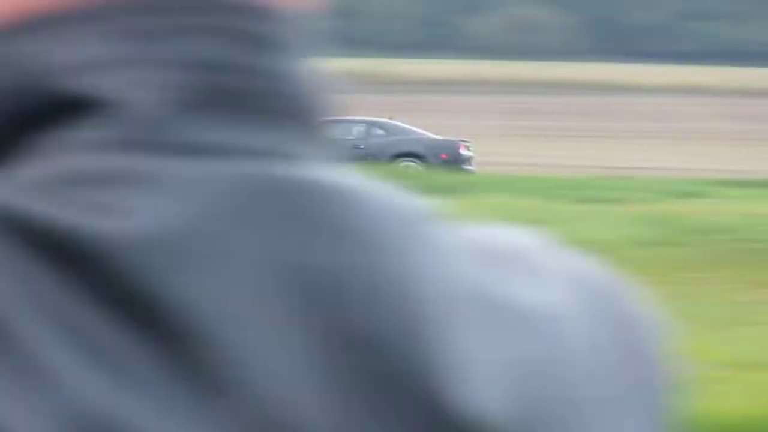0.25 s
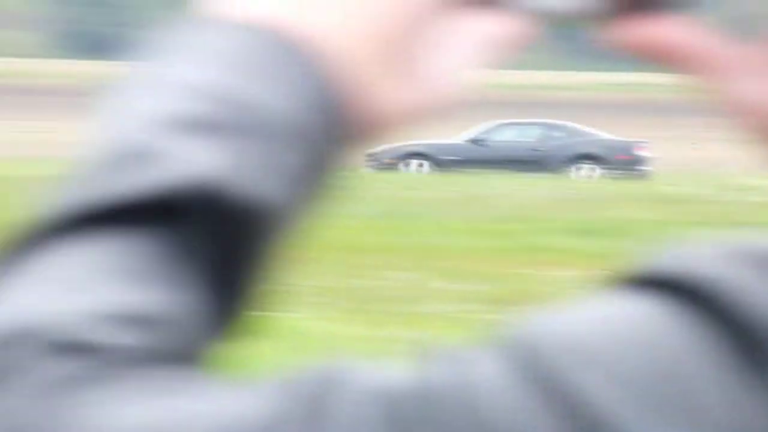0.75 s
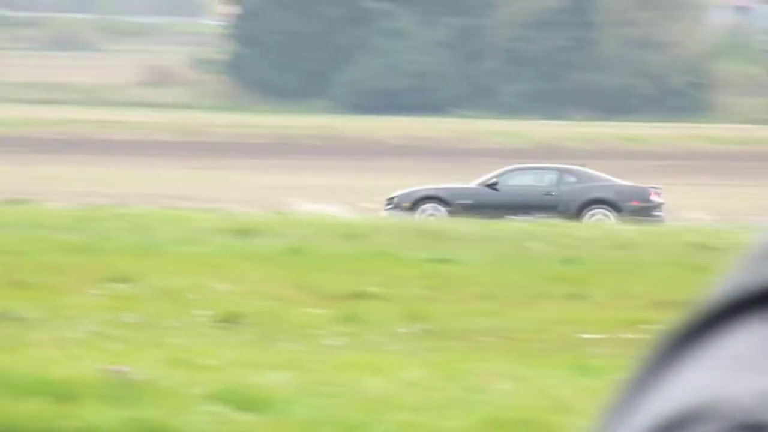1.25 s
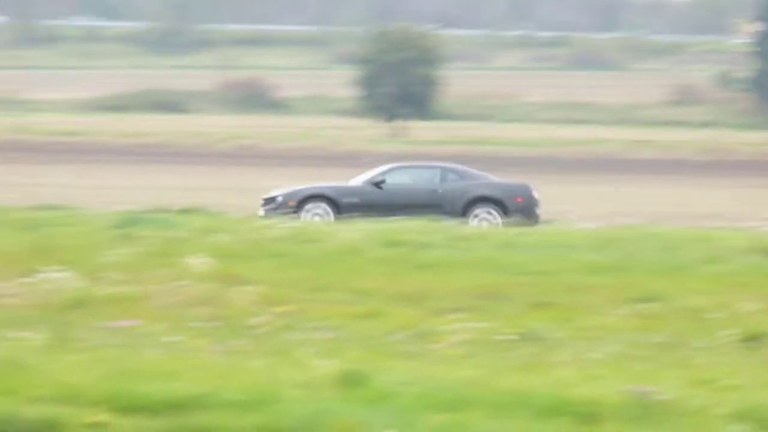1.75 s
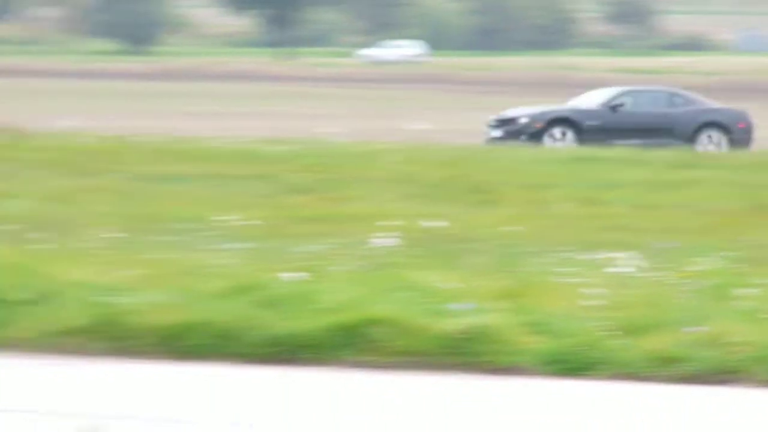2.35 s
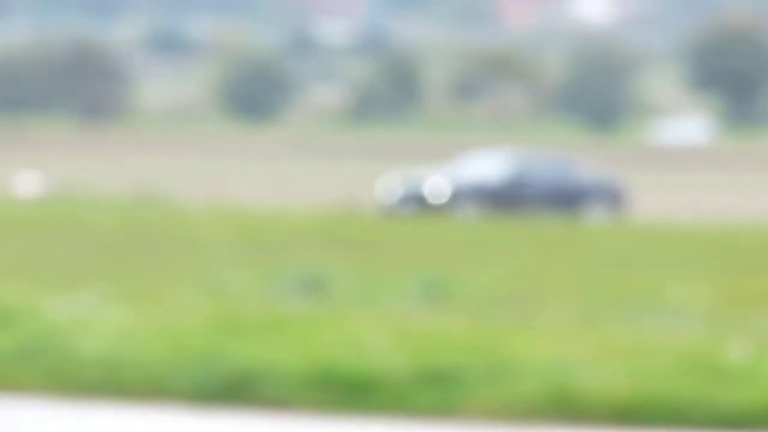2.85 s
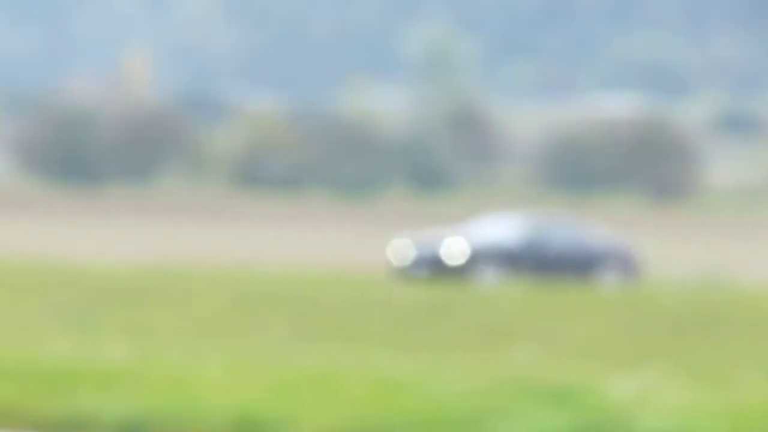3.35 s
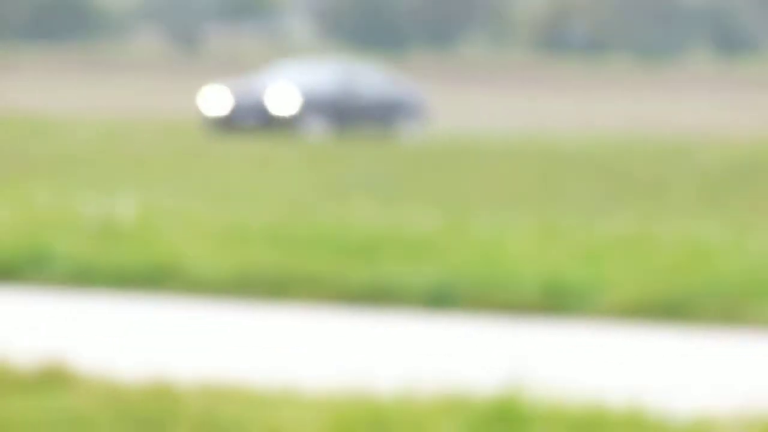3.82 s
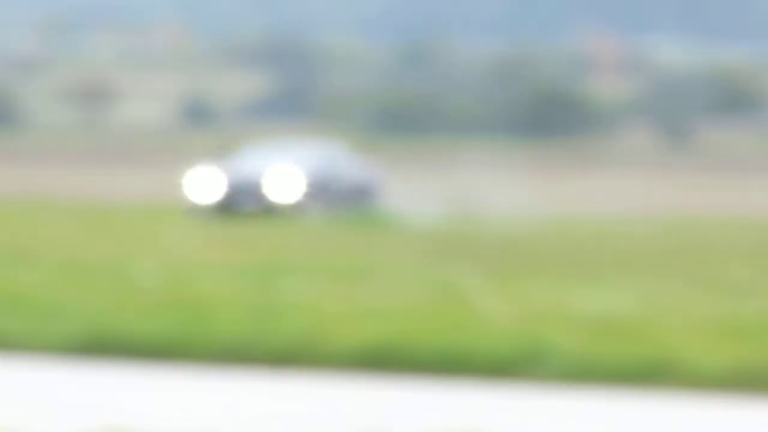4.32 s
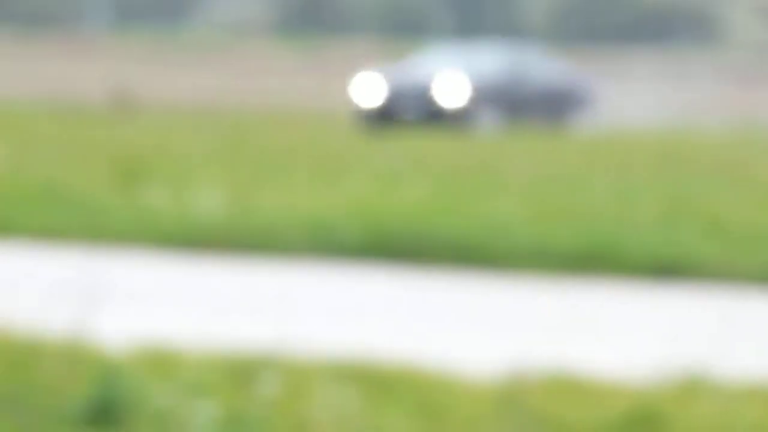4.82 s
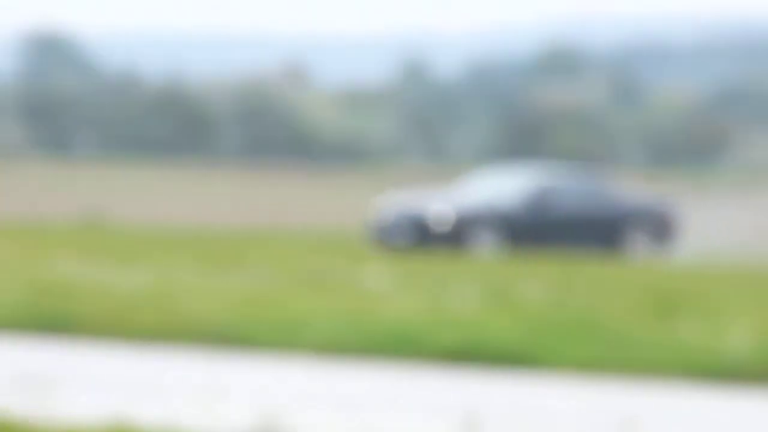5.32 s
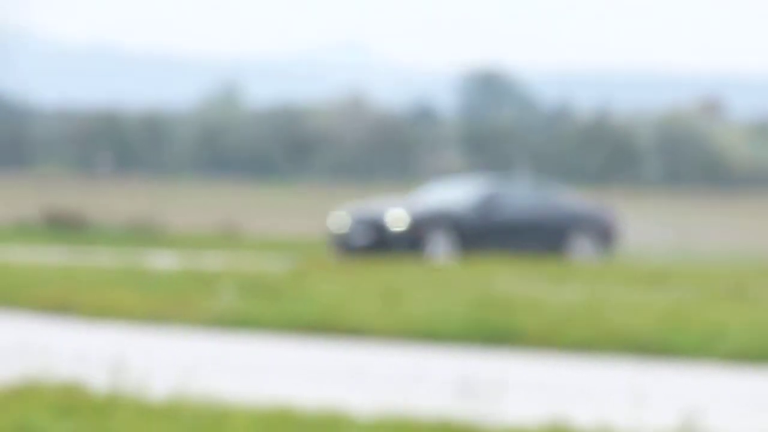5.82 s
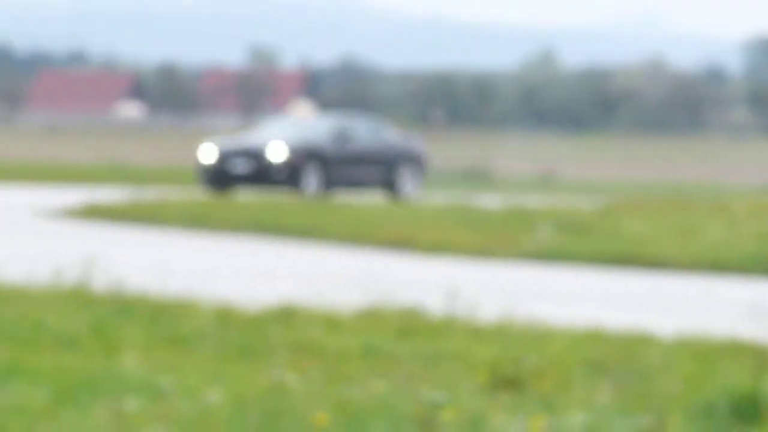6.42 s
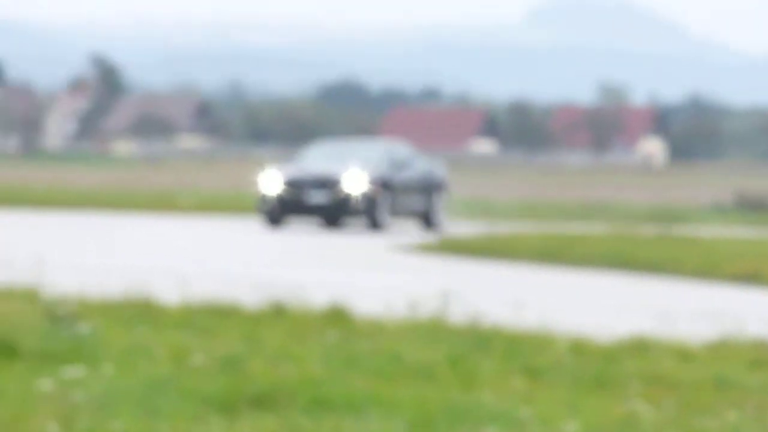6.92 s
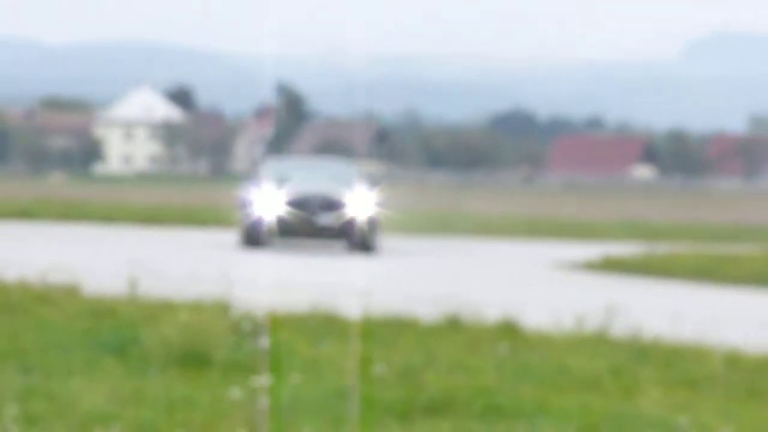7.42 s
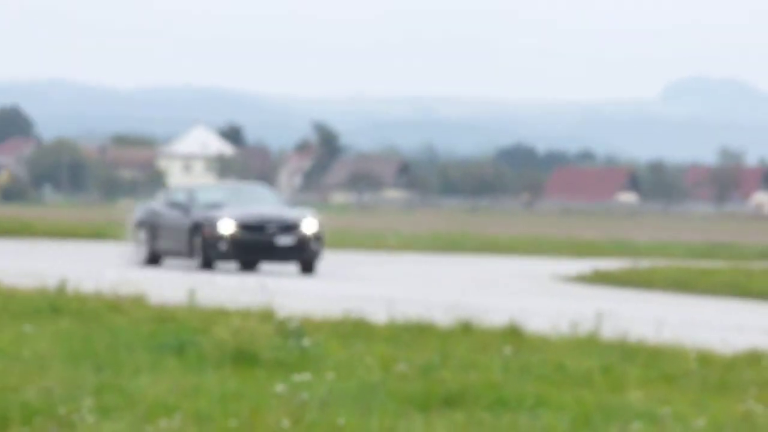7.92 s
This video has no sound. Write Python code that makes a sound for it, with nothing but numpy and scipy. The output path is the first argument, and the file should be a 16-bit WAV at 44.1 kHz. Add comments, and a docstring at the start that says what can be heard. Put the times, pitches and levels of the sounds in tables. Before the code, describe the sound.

Wind rumbles on an outdoor microphone over the soft rush of distant tyres, and a jacket rustles faintly close by. A car then slides into a long, rough, wavering tyre squeal with its exhaust droning low underneath. The squeal dies away and strong gusts thump the microphone. A second, slightly higher and rougher squeal follows, continuing to the end under heavy wind.

```python
"""Wind on the microphone comes first, over tyres rolling far off across grass; a jacket rustles close by.
Out on the open track a tyre moans, then a V8 coupe drifts through two bends, side on and then nose on.
Its tyres stick and slip in wavering, rough squeals, with the exhaust droning under the first slide.
Gusts buffet the camera microphone throughout, hardest between the two slides."""
import sys
import numpy as np
from scipy import signal
from scipy.fft import rfft, irfft
from scipy.io import wavfile

SR = 44100
rng = np.random.default_rng(int(sys.argv[2]) if len(sys.argv) > 2 else 0)


def bounce(signal):
    """Save signal as a 16-bit WAV file at the path given by the first command-line argument."""
    frames = np.transpose(np.atleast_2d(signal))
    limited = np.clip(frames, -1, 1)
    pcm = np.round(limited * 32767).astype(np.int16)
    wavfile.write(sys.argv[1], SR, pcm)


N = 360297

# The breeze at the microphone. Each row: time in seconds, strength in dB.
BREEZE = [(0.0, -41), (0.45, -41.5), (1.2, -32), (1.95, -37.5), (3.1, -40.5), (3.25, -34), (3.95, -34),
          (4.2, -43.5), (4.82, -52), (4.92, -26.5), (5.46, -31.5), (5.52, -42.5), (5.58, -24),
          (6.15, -19.5), (6.6, -17), (6.95, -22), (7.5, -24), (7.62, -23), (8.17, -18.5)]
# Gusts on top of it. Each row: peak time in seconds, half length in seconds, strength in dB.
GUSTS = [(0.118, 0.037, -35), (0.291, 0.024, -33.5), (0.75, 0.011, -28.5), (0.871, 0.028, -27),
         (1.07, 0.025, -30), (1.114, 0.018, -31), (1.355, 0.024, -34), (2.869, 0.024, -32.5),
         (3.233, 0.03, -29.5), (3.361, 0.031, -29.5), (3.866, 0.05, -29.5), (4.332, 0.028, -33),
         (4.984, 0.033, -23.5), (5.147, 0.028, -22), (5.22, 0.025, -23), (5.354, 0.015, -24),
         (5.431, 0.038, -24), (5.574, 0.062, -18.5), (5.654, 0.014, -16), (5.689, 0.0091, -20),
         (5.83, 0.029, -14.5), (6.05, 0.015, -19.5), (6.076, 0.01, -19.5), (6.215, 0.022, -19),
         (6.288, 0.01, -18), (7.038, 0.02, -21), (7.57, 0.04, -22), (7.758, 0.041, -21)]
# Eddies on the microphone, largest to smallest. Each row: frequency in Hz, relative density in dB.
HEAVE_SPECTRUM = [(15, -8), (35, -1), (70, 1.5), (110, -6)]
RUMBLE_SPECTRUM = [(45, -8), (75, 1), (120, 2), (200, 0), (260, -8.5), (340, -31)]
FLUTTER_SPECTRUM = [(70, -22.5), (140, 1), (220, 0.5), (320, -3), (450, -11), (700, -24.5), (1200, -54)]
SPLUTTER_SPECTRUM = [(200, -5), (400, 5.5), (600, -3), (1000, -11.5), (2000, -26), (3500, -68)]
# Rolling tyres from across the grass. Each row: frequency in Hz, relative density in dB.
ROLLING_SPECTRUM = [(420, -15.5), (530, -5), (700, -7.5), (960, -3.5), (1200, -9.5), (1650, -17),
                    (2400, -30), (3100, -33.5), (4200, -52)]
# Their rise as the scene opens. Each row: time in seconds, level in dB.
ROLLING_LEVEL = [(0.0, -54.5), (0.906, -49.5), (1.8, -49.5)]
# A jacket near the microphone. Each row: peak time in seconds, half length in seconds, level in dB.
RUSTLES = [(0.38, 0.062, -67.5), (0.83, 0.091, -69)]
# Its brushing cloth. Each row: frequency in Hz, relative density in dB.
CLOTH_SPECTRUM = [(1800, 2), (2700, 2), (3400, -9), (4200, -16)]
# Moans ahead of the first bend. Each row: peak time in seconds, half length in seconds, level in dB.
MOANS = [(0.85, 0.17, -51.5), (1.78, 0.18, -51.5)]
# The leading tyre, one curve a bend. Each row: time in seconds, slip pitch in Hz, load in dB.
FIRST_LEAD_TYRE = [(1.92, 927, -19.5), (2.07, 909, -8.5), (2.18, 869, -2.5), (2.26, 744, -4),
                   (2.44, 736, 0.5), (2.55, 821.6, -1), (2.68, 819.6, -1.5), (2.81, 838.1, 2),
                   (2.95, 752, 3), (3.13, 759.6, 1), (3.36, 812.6, -1), (3.74, 893, 0.5), (3.85, 839.3, -2),
                   (4.08, 869.7, 3), (4.3, 848.5, -3), (4.47, 820.5, -1), (4.6, 874.4, -1), (4.88, 838, -1),
                   (4.99, 842, -4), (5.1, 815.3, 2), (5.24, 778.5, -4), (5.42, 828, -8), (5.54, 892, -35)]
SECOND_LEAD_TYRE = [(6.14, 895, -16), (6.2, 878, -9), (6.48, 897, -6), (6.68, 907.5, -1), (6.84, 900, -4),
                    (7.16, 931.6, -3.5), (7.39, 954, 0), (7.48, 894, -1), (7.77, 916.6, -0.5),
                    (7.9, 911, 0.5), (8.17, 899, 0)]
# The other driven tyre. Each row: time in seconds, slip pitch in Hz, load in dB against the leading one.
FIRST_LOW_TYRE = [(1.98, 712, 2), (2.1, 652, 3), (2.3, 626.3, 2.5), (2.65, 695.6, -5), (3.03, 636, -3),
                  (3.6, 728.7, -2), (4.42, 703.5, 0.5), (4.75, 760.5, -0.5), (5.3, 702.5, -2.5)]
SECOND_LOW_TYRE = [(6.2, 827, 3.5), (6.7, 802, -1.5), (7.1, 815, -4), (7.7, 771, -6), (8.17, 754, 2)]
# Wheelspin in each bend. Each row: time in seconds, amount in dB against a steady drift.
FIRST_SPIN = [(1.9, -7), (2.07, -1), (2.5, -8), (2.76, -3.5), (3.0, -9), (3.6, -2), (3.95, 4.5),
              (4.12, 8.5), (4.3, 3), (4.44, 3), (4.56, 9.5), (4.98, 2), (5.5, -40)]
SECOND_SPIN = [(6.2, -27.5), (6.9, -11.5), (7.16, 0.5), (7.39, 3.5), (7.47, -7.5), (7.65, -7.5),
               (8.17, 2.5)]
# Tyre resonances lift any overtone passing through. Each row: frequency in Hz, level in dB at full load.
CARCASS_RESONANCES = [(630, -40.5), (770, -38.5), (845, -28.5), (900, -35), (960, -28.5), (1270, -43),
                      (1400, -38), (1510, -36), (1600, -36.5), (1700, -43.5), (1850, -55.5), (2250, -64.5),
                      (2700, -58.5), (3500, -78.5)]
# Tearing rubber, heard from two angles. Each row: frequency in Hz, relative density in dB.
RASP_SIDE_ON = [(1150, -11), (1420, 3.5), (1660, 0), (1780, -10.5), (2000, -18.5), (2250, -9.5),
                (2650, -13), (3400, -22.5), (3800, -35.5), (5500, -47)]
RASP_NOSE_ON = [(1150, -4.5), (1420, 2), (1660, 2), (1800, -7.5), (2050, -14.5), (2300, -6), (2500, -11),
                (2800, -13), (3500, -20.5), (3950, -34), (5500, -44)]
# The leading tyre bites. Each row: peak time in seconds, half length in seconds, relative level in dB.
BITES = [(2.358, 0.029, -42), (2.89, 0.049, -49.5), (3.09, 0.063, -47.5), (3.33, 0.024, -57),
         (4.418, 0.04, -51.5), (5.12, 0.043, -49.5), (5.24, 0.052, -54)]
# The distant exhaust. Each row: time in seconds, pitch of the fifth order in Hz, relative level in dB.
EXHAUST_CURVE = [(2.35, 117, -65), (2.5, 124, -24), (2.76, 135, -29.5), (3.0, 119, -59), (3.15, 123, -36.5),
                 (3.35, 135, -34.5), (4.05, 148, -42.5), (4.6, 154, -41), (4.9, 150, -43)]
# Its orders. Each row: multiple of the four-stroke cycle, relative level in dB side on, then nose on.
EXHAUST_ORDERS = [(3, -13, -7.5), (4, -17, -10), (5, 0.5, 6.5), (6, -16.5, -23.5), (8, -6, -47.5)]


def from_db(db):
    """Decibels to gain."""
    return 10 ** (np.asarray(db) / 20)


def unit_rms(x):
    """Scale to an rms of 1."""
    return x / np.sqrt(np.mean(x ** 2) + 1e-20)


def in_time(rows):
    """Each column of a curve at every sample."""
    times, *columns = np.transpose(rows)
    return [np.interp(np.arange(N) / SR, times, column) for column in columns]


def during(rows, fade_s=0.075):
    """A gain of 1 over the span of a curve, fading outside it."""
    t = np.arange(N) / SR
    return np.clip(1 + np.minimum(t - rows[0][0], rows[-1][0] - t) / fade_s, 0, 1)


def swells(rows):
    """A gain that rises and falls smoothly once for each event."""
    t = np.arange(N) / SR
    return sum(from_db(db) * np.exp(-np.minimum(((t - peak_s) / half_s) ** 2, 50))
               for peak_s, half_s, db in rows)


def wander(rate_hz):
    """A random curve of rms 1, changing about rate_hz times a second."""
    hz = np.fft.rfftfreq(N, 1 / SR)
    return unit_rms(irfft(rfft(rng.standard_normal(N)) / (1 + (hz / rate_hz) ** 4), N))


def lumps(rate_hz, depth_db):
    """A randomly swelling gain of unit power."""
    return unit_rms(from_db(depth_db * np.clip(wander(rate_hz), -2, 2)))


def coloured(x, spectrum):
    """A sound shaped by a spectrum that falls steeply beyond its ends; rms 1."""
    hz = np.fft.rfftfreq(N, 1 / SR) + 1e-3
    points_hz, db = np.transpose(spectrum)
    skirts = np.minimum(1, np.minimum(hz / points_hz[0], points_hz[-1] / hz)) ** 6
    gain = from_db(np.interp(np.log(hz), np.log(points_hz), db))
    return unit_rms(irfft(rfft(x) * skirts * gain, N))


def noise(spectrum):
    """Coloured noise of rms 1."""
    return coloured(rng.standard_normal(N), spectrum)


def phase_of(hz):
    """Running phase of a moving frequency."""
    return 2 * np.pi * np.cumsum(hz) / SR


def wind(stiff_db, heave_db, rumble_db, flutter_db, splutter_db):
    """Turbulence hits the microphone in lumps; the harder it blows, the smaller and brighter its eddies."""
    breeze_db, = in_time(BREEZE)
    force = np.hypot(from_db(breeze_db), swells(GUSTS)) / from_db(stiff_db)   # 1 in a stiff wind
    eddies = lumps(46, 4.22)
    heave = from_db(heave_db) * force ** 0.28 * noise(HEAVE_SPECTRUM) * lumps(12, 3.6)
    rumble = from_db(rumble_db) * force ** 0.67 * noise(RUMBLE_SPECTRUM) * lumps(24, 3.1)
    flutter = from_db(flutter_db) * force ** 1.36 * eddies * noise(FLUTTER_SPECTRUM)
    splutter_gain = from_db(splutter_db) * force ** 2 * eddies ** 0.69
    splutter = splutter_gain * noise(SPLUTTER_SPECTRUM) * lumps(80, 8.5)
    return from_db(stiff_db) * (heave + rumble + flutter + splutter)


def buffets(width_s, spread, level_db, crackle_db):
    """Each gust's core eddy is a pressure dip between two smaller swells; a strong one crackles apart."""
    pressure, t = np.zeros(N), np.arange(N) / SR
    for (peak_s, _, db), size in zip(GUSTS, rng.standard_normal(len(GUSTS))):
        near = np.abs(t - peak_s) < 0.03
        offset = (t[near] - peak_s - 0.003) / (width_s * np.exp(spread * size))
        pressure[near] += from_db(db + level_db) * (offset ** 2 - 1) * np.exp(-offset ** 2 / 2)
    return pressure + from_db(crackle_db) * pressure ** 2 * noise(SPLUTTER_SPECTRUM)


def rolling_tyres():
    """The soft rush of tread on the track, far from the microphone."""
    level_db, = in_time(ROLLING_LEVEL)
    return from_db(level_db) * noise(ROLLING_SPECTRUM)


def jacket():
    """A bystander's jacket brushes past, close by."""
    return swells(RUSTLES) * noise(CLOTH_SPECTRUM)


def stick_slip(hz, waver, jitter):
    """Phase of tread blocks that grip and let go at an unsteady rate."""
    return phase_of(hz * (1 + waver * wander(21.93) + jitter * wander(193.5)))


def tyre_moan():
    """A tyre moans faintly as it loads up before the slide."""
    return swells(MOANS) * np.sin(stick_slip(hz=518, waver=0.011, jitter=0.028))


def squeal(hz, phase, load_db, spin_db, flicker_db, octave_db=0, third_db=0):
    """Four stick-slip harmonics ring through the tyre's resonances, each with its own flicker."""
    carcass_hz, carcass_db = np.transpose(CARCASS_RESONANCES)
    full_spin_db, light_load_db = -4, -7.5
    excess_db = spin_db - full_spin_db
    # Too little wheelspin starves the fundamental; too much, or a light load, fades the octave.
    octave_loss_db = 0.35 * np.maximum(excess_db, 0) + np.maximum(light_load_db - load_db, 0)
    lifts_db = [0.75 * np.minimum(excess_db, 0), octave_db - octave_loss_db, third_db, 0]
    tone = np.zeros(N)
    for k, lift_db in enumerate(lifts_db, start=1):
        gain = from_db(load_db + np.interp(k * hz, carcass_hz, carcass_db) + lift_db)
        tone += gain * np.sin(k * phase) * lumps(38, flicker_db)
    return np.sqrt(2) * tone


def scrub(slip_hz, load_db, spin_db, spectrum, chatter_hz, spread, chatter_db, rasp_db, strands_db):
    """Tread patches chatter out of step; others scream in strands of overtones, over tearing rubber."""
    chatter = sum(np.sin(stick_slip(chatter_hz, spread, jitter=0.025)) * lumps(85, 4) for _ in range(3))
    patches = [stick_slip(0.99 * slip_hz, waver=0.03, jitter=0.0147) for _ in range(3)]
    strands = coloured(sum(np.sin(k * phase) for phase in patches for k in range(2, 6)), spectrum)
    grit = (from_db(rasp_db) * noise(spectrum) + from_db(strands_db) * strands) * lumps(32, 2.5)
    grit_db = -47 + load_db + 0.32 * spin_db
    return from_db(spin_db + chatter_db) * unit_rms(chatter) + from_db(grit_db) * grit


def first_slide():
    """Side on to the microphone: as the pitch sags the octave takes over, and the leading tyre bites."""
    hz, load_db = in_time(FIRST_LEAD_TYRE)
    low_hz, low_db = in_time(FIRST_LOW_TYRE)
    spin_db, = in_time(FIRST_SPIN)
    phase = stick_slip(hz, waver=0.01182, jitter=0.01508)
    lead = squeal(hz, phase, load_db, spin_db, flicker_db=3.5, octave_db=1.5, third_db=0.5)
    bites = shriek(phase, fall_db=16, odd_db=-2, octave_db=17)
    low_phase = stick_slip(low_hz, waver=0.012, jitter=0.018)
    low = squeal(low_hz, low_phase, load_db + low_db, spin_db, flicker_db=4.5, octave_db=-1)
    tread = scrub(hz, load_db, spin_db, RASP_SIDE_ON, chatter_hz=937, spread=0.044,
                  chatter_db=-36.5, rasp_db=5.5, strands_db=-0.5)
    torn_rubber = from_db(-8) * swells(BITES) * noise(RASP_SIDE_ON[4:])   # only the top of the rasp
    return during(FIRST_LEAD_TYRE) * (lead + bites + low + tread + torn_rubber)


def shriek(phase, fall_db, odd_db, octave_db):
    """A hard bite sharpens each slip: the octave leaps out with high, ragged overtones."""
    ragged = phase + 0.17 * wander(180)
    overtones = sum(from_db(odd_db * (k % 2) - fall_db * max(k - 4, 0) ** 0.5) * np.sin(k * ragged)
                    for k in range(3, 9))
    return swells(BITES) * (overtones + from_db(octave_db) * np.sin(2 * ragged))


def exhaust():
    """Uneven firing in each bank stresses the fifth order; the firing note fades as the nose turns in."""
    hz, db = in_time(EXHAUST_CURVE)
    cycle = phase_of(hz * (1 + 0.005 * wander(20))) / 5
    nose_on, = in_time([(2.8, 0), (4.1, 0.96)])   # 0 is side on, 1 is facing the microphone
    drone = sum(from_db(side_db + nose_on * (nose_db - side_db)) * np.sin(k * cycle) * lumps(12, 3.6)
                for k, side_db, nose_db in EXHAUST_ORDERS)
    return np.sqrt(2) * from_db(db - 5.5) * drone * during(EXHAUST_CURVE, fade_s=0.44)


def second_slide():
    """Nose on: higher and rougher, turning hollow as the tail swings and the third harmonic stands out."""
    hz, load_db = in_time(SECOND_LEAD_TYRE)
    low_hz, low_db = in_time(SECOND_LOW_TYRE)
    spin_db, = in_time(SECOND_SPIN)
    swing_start_s, swing_length_s = 7.55, 0.052
    swung = np.clip((np.arange(N) / SR - swing_start_s) / swing_length_s, 0, 1)
    phase = stick_slip(hz, waver=0.01536, jitter=0.0176)
    lead = squeal(hz, phase, load_db - 0.6, spin_db, flicker_db=0, third_db=14 * swung)
    low_phase = stick_slip(low_hz, waver=0.01236, jitter=0.018)
    low = squeal(low_hz, low_phase, load_db + low_db - 0.5, spin_db, flicker_db=4.5, octave_db=-2)
    tread = scrub(hz, load_db, spin_db, RASP_NOSE_ON, chatter_hz=952, spread=0.047,
                  chatter_db=-31, rasp_db=8, strands_db=2.5)
    return during(SECOND_LEAD_TYRE) * (lead + low + tread)


def outdoors(x, echo_db, longest_s, count=10):
    """The direct sound with faint, dull echoes from the ground and the far tree line."""
    dull = signal.sosfilt(signal.butter(2, 2500, fs=SR, output="sos"), x)
    lags = (rng.uniform(0.11, 1, count) * longest_s * SR).astype(int)
    echoes = sum(np.pad(dull, (lag, 0))[:N] for lag in lags) / np.sqrt(count)
    return x + from_db(echo_db) * echoes


def scene():
    """One spot on the grass, in mono: the car far off, the wind and the jacket close at hand."""
    rolling = rolling_tyres()
    squeals = tyre_moan() + first_slide() + second_slide()
    car = rolling + outdoors(squeals, echo_db=-11, longest_s=0.085) + exhaust()
    air = wind(stiff_db=-23.5, heave_db=-19, rumble_db=-9, flutter_db=-9, splutter_db=-20.5)
    thumps = buffets(width_s=0.0013, spread=0.19, level_db=7.5, crackle_db=-5.5)
    return (car + air + thumps + jacket())[None]


def record(dry):
    """A narrow-band camera microphone flattens the strongest gusts and adds hiss and electronic whine."""
    ceiling, whine_hz, cutoff_hz = 0.36, 6666, 7800
    flattened = dry / (1 + (dry / ceiling) ** 4) ** 0.25
    hiss = from_db(-64) * rng.standard_normal(N)
    whine = from_db(-84) * np.sin(phase_of(np.full(N, whine_hz)))
    return signal.sosfilt(signal.butter(18, cutoff_hz, fs=SR, output="sos"), flattened + hiss + whine)


dry = scene()
out = record(dry)
bounce(out)
```